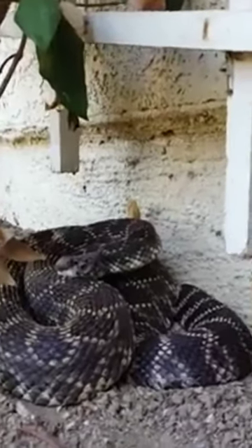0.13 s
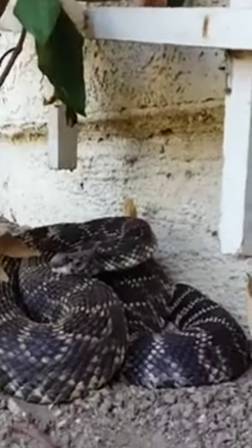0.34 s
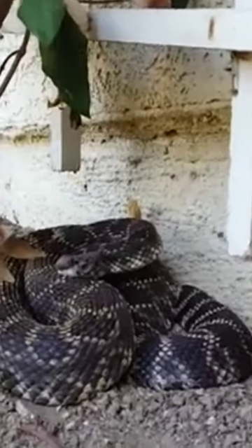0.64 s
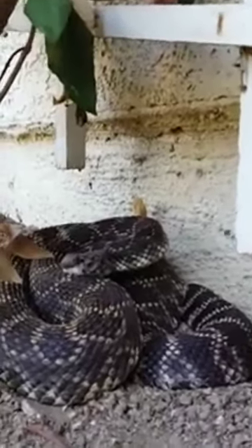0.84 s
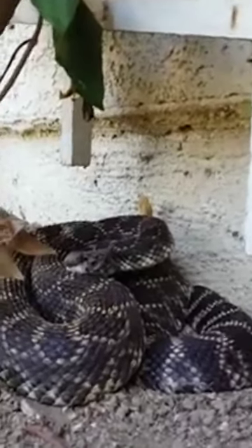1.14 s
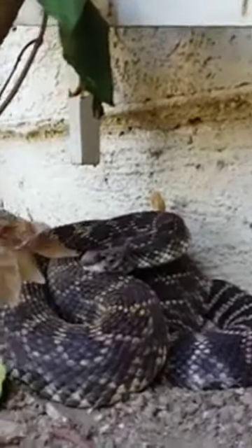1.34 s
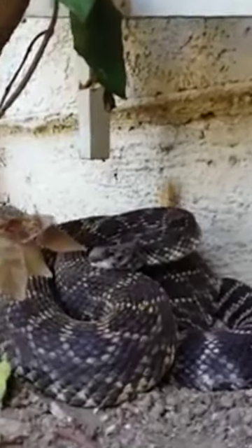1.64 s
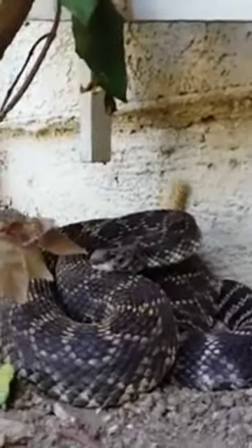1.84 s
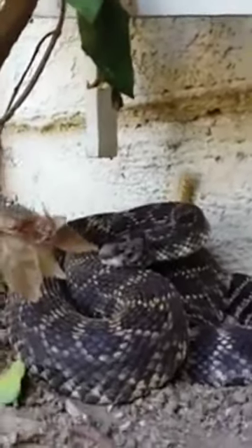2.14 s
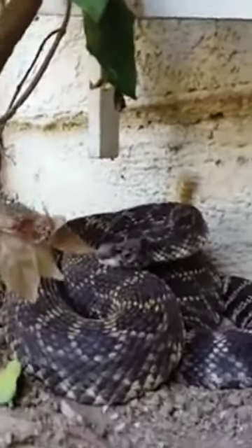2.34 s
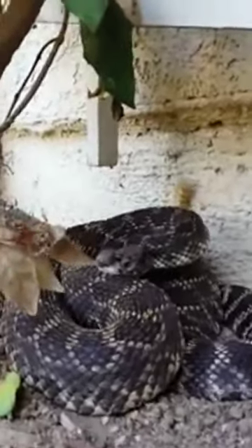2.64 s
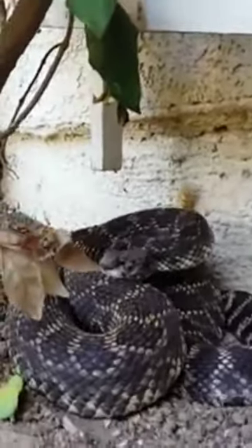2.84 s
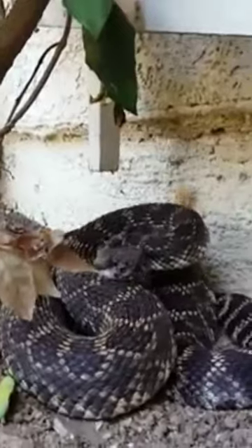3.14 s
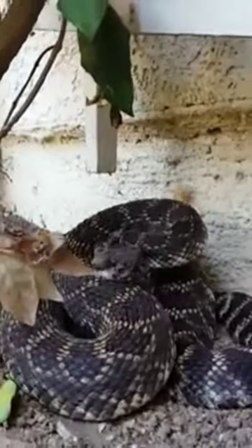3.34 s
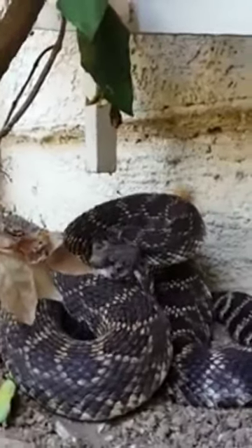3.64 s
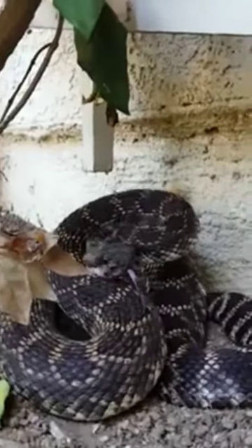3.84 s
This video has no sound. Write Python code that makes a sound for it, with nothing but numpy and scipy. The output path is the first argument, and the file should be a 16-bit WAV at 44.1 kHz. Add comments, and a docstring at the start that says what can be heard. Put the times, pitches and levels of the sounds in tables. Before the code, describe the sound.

A rattlesnake's loud, dry buzzing rattle bursts out after a quiet, faintly ticking outdoor moment.

```python
"""A low outdoor rumble, a faint steady whine and a soft rustle run throughout.
A few small ticks and dry scuffs come first: short dying rings with cracks, and swells of grainy noise.
At about 1.6 s a coiled rattlesnake on gravel beside a wall stirs, then shakes its tail into a loud dry buzz.
At each turn of the tail the loose hollow segments scrape and knock; wall and ground scatter the clicks.
Three soft hollow taps, made of dying tones, fall near 2 s as the buzz grows."""
import sys
import numpy as np
from scipy import signal
from scipy.fft import rfft, irfft
from scipy.io import wavfile

SR = 44100
rng = np.random.default_rng(int(sys.argv[2]) if len(sys.argv) > 2 else 0)


def wrap_up_sound(samples):
    """Save the sound to the file named by the first command line argument, as 16-bit audio."""
    columns = np.atleast_2d(samples).T
    # keep every value between -1 and 1, then stretch to whole-number steps
    tamed = np.clip(columns, -1, 1)
    steps = np.round(tamed * 32767).astype(np.int16)
    wavfile.write(sys.argv[1], SR, steps)


N = 176400
PADDED = N + SR // 10  # room for tails, so that filters do not wrap around
TIME, FREQ = np.arange(N) / SR, np.fft.rfftfreq(PADDED, 1 / SR)


def amp(db):
    """Turns decibels into gain."""
    return 10 ** (np.asarray(db) / 20)


def unit(x):
    """Scales to an rms of 1."""
    return x / np.sqrt(np.mean(x ** 2) + 1e-20)


def over_hz(table, axis=1):
    """Reads one column of a table at every frequency, on a log-frequency axis."""
    table = np.array(table)
    return np.interp(np.log(FREQ + 1), np.log(table[:, 0] + 1), table[:, axis])


def level(curve):
    """Draws gain over time from rows of seconds and dB."""
    return amp(np.interp(TIME, *np.transpose(curve)))


def colour(x, table):
    """Filters by a spectrum, keeping the power of white noise."""
    return irfft(rfft(x, PADDED) * unit(amp(over_hz(table))))[:, :N]


def drift(rate_hz):
    """Makes a random motion of rms 1 by keeping only the slow part of noise."""
    slow = np.exp(-(FREQ / rate_hz) ** 2) * (FREQ > 0)
    return unit(irfft(rfft(rng.standard_normal(PADDED)) * slow)[:N])


def pan(pan_db):
    """Gains for left and right; a negative value leans to the right."""
    return amp([[pan_db / 2], [-pan_db / 2]])


def noise_pair(same, pan_db):
    """White noise for left and right, alike by the share 'same' (0 to 1)."""
    a, b = rng.standard_normal((2, N))
    return np.array([a, same * a + np.sqrt(1 - same ** 2) * b]) * pan(pan_db)


def ring(hz, t60):
    """One dying tone, started at a random phase; it falls 60 dB in t60 seconds."""
    t = TIME[:SR // 8]
    return amp(-60 * t / t60) * np.sin(2 * np.pi * (hz * t + rng.random()))


def add(mix, s, sound):
    """Adds a sound to the mix at its time in seconds."""
    part = mix[round(s * SR):][:len(sound)]
    part += sound[:len(part)]


# Effort of the tail. Each row: time in seconds, relative level in dB.
EFFORT = [(1.55, -60), (1.585, -32), (1.63, -31.5), (1.66, -18), (1.71, -20.5), (1.76, -12.5), (1.86, -9),
          (1.96, -4), (2.18, -1), (2.55, 0.7), (3.1, 1), (3.62, 2), (4, 2)]
# First loose knocks. Each row: time in seconds, relative strength in dB.
STIRS = [(1.572, 3), (1.576, -3), (1.589, 3), (1.617, 0), (1.652, 7.5), (1.664, 3), (1.683, 5)]
SHAKE_HZ, SHAKE_WANDER = 70.56, .012  # full swings per second, rms wander as a share of that
SEGMENT_LAG, KNOCK_JITTER_S = .114, .0004  # lag of each segment in strokes, rms timing scatter
BACKSTROKE_DB, STROKE_SPREAD_DB, KNOCK_SPREAD_DB, FLUTTER_DB = -1.5, .2, 1.4, .2
SLIDE_S, SCRAPES_PER_S = .0012, 16000  # build-up time of a slide, scrape chances over all segments
SCRAPE_SHARE, SCRAPE_SPREAD_DB = .4, 1.5  # scrapes' share of the power, spread of their strength


def segment_clicks(count=8):
    """One click train per segment: at each turn of the tail it slides, chattering harder, until it knocks."""
    speed = SHAKE_HZ * (1 + SHAKE_WANDER * drift(4))
    strokes = 2 * np.cumsum(speed) / SR
    turns = TIME[1:][np.diff(np.floor(strokes)) > 0]
    backstroke = np.arange(len(turns)) % 2
    stroke_db = BACKSTROKE_DB * backstroke + STROKE_SPREAD_DB * rng.standard_normal(len(turns))
    force = level(EFFORT) * amp(FLUTTER_DB * drift(9.0))

    knocks = np.zeros((count, N))
    for k, train in enumerate(knocks):
        late, hard = rng.standard_normal((2, len(turns)))
        at = turns + k * SEGMENT_LAG / (2 * SHAKE_HZ) + KNOCK_JITTER_S * late
        strength = amp(stroke_db + KNOCK_SPREAD_DB * np.minimum(hard, 2))
        train[(at * SR).astype(int) % N] = strength * rng.choice([-1, 1], len(turns))

    # A decay run backwards in time grows towards each knock
    fade = np.exp(-1 / (SLIDE_S * SR))
    slide = signal.lfilter([1], [1, -fade], abs(knocks)[:, ::-1])[:, ::-1]
    grit_db = SCRAPE_SPREAD_DB * np.minimum(rng.exponential(1, (count, N)), 3)
    grit = amp(grit_db) * rng.choice([-1, 1], (count, N))
    catches = rng.random((count, N)) < SCRAPES_PER_S / count / SR
    scrapes = np.sqrt(slide) * grit * catches

    mix = np.sqrt(1 - SCRAPE_SHARE) * unit(knocks) + np.sqrt(SCRAPE_SHARE) * unit(scrapes)
    trains = mix * force / np.sqrt(count)
    for train, (s, db) in zip(trains, STIRS):  # each stir knocks a different segment
        train[round(s * SR)] += amp(db)
    return trains


GROUND_ECHO_S, GROUND_ECHO_DB = .0009, -15
SWAY_S, SWAY_HZ = .00022, 7  # rms shift of the echo, quickness of the shift


def sway(x):
    """The ground's reflection shifts as the tail sways, so the resonances swell and fade."""
    late = TIME - GROUND_ECHO_S - SWAY_S * drift(SWAY_HZ)
    return x + amp(GROUND_ECHO_DB) * np.interp(late, TIME, x)


# Ring of the hollow segments. Each row: frequency in Hz, left and right relative levels in dB.
SHELL = [(300, -41, -32.5), (694, -35, -33.5), (1120, -37.5, -34.5), (1710, -28.5, -27), (2040, -17, -21),
         (2290, -19.5, -20.5), (2380, -12, -14.5), (2840, -6, -14.5), (3020, -15.5, -8.5),
         (3496, -8.5, -7.5), (3764, -11.5, -2), (3930, -5.5, -7), (4190, -13, 0.5), (4500, -7, -1),
         (4670, -10.5, -0.5), (4950, -11.5, -9), (5390, -20, -5), (5900, -16, 0.5), (6050, -11, -3.5),
         (6340, -19, -14.5), (6530, -19.5, -11), (6910, -20, -19), (8020, -16.5, -26.5), (8830, -19, -45),
         (10200, -26.5, -50), (11230, -19, -23), (12500, -18, -18.5), (15300, -19, -20)]
# Likeness of left and right. Each row: frequency in Hz, likeness from 0 to 1, right phase in radians.
LIKENESS = [(700, 0.36, 0.5), (1100, 0.46, -1), (1515, 0.99, -3), (2050, 0.89, -2.5), (2500, 0.77, -3.5),
            (2910, 0.61, -2.5), (3320, 0.67, -4), (3490, 0.58, -3.5), (3794, 0.73, -5.5), (4060, .5, -3.5),
            (4380, 0.72, -2), (4490, 0.34, -7.5), (4670, 0.75, -5), (6080, 0.52, -7), (6630, 0, -3),
            (11100, 0.01, -8), (15400, 0, -14.5)]
RATTLE_DB, SCATTER_T60_S = -21, 0.018
WALL_ECHO_S, WALL_ECHO_DB = .00463, -12


def rattle():
    """The clicks ring the shell and arrive directly, off the wall, and scattered by the ground."""
    trains = segment_clicks()
    t = TIME[:SR // 20]
    tails = rng.standard_normal((2, len(trains), len(t))) * amp(-60 * t / SCATTER_T60_S)
    tails /= np.linalg.norm(tails, axis=2, keepdims=True)
    scattered = sum(signal.oaconvolve(train[None], tails[:, k], axes=1) for k, train in enumerate(trains))

    same = over_hz(LIKENESS)
    phase = np.outer([0, 1], over_hz(LIKENESS, axis=2))  # turns the right side only
    direct = rfft(sway(trains.sum(0)), PADDED) * np.exp(1j * phase)
    arriving = np.sqrt(same) * direct + np.sqrt(1 - same) * rfft(scattered, PADDED)
    wall = 1 + amp(WALL_ECHO_DB) * np.exp(-2j * np.pi * FREQ * WALL_ECHO_S)
    shell = unit(amp([over_hz(SHELL, axis=1), over_hz(SHELL, axis=2)]))
    return amp(RATTLE_DB) * irfft(shell * wall * arriving)[:, :N]


# Boost or cut of the band around 2 kHz. Each row: time in seconds, gain in dB.
BAND_LEVEL = [(1.6, 4), (1.9, 1.5), (2.25, 4), (2.6, 1), (3.1, -0.5), (4, -2)]
BAND_HZ, BAND_WIDTH_HZ = 2100, 520
BAND_DRIFT_DB, BAND_DRIFT_HZ = 2.3, 14


def lower_band(x):
    """The band around 2 kHz is louder early than late; a slow random gain varies its level."""
    bell = np.exp(-((FREQ - BAND_HZ) / BAND_WIDTH_HZ) ** 2)
    band = irfft(rfft(x, PADDED) * bell)[:, :N]
    gain = level(BAND_LEVEL) * amp(BAND_DRIFT_DB * drift(BAND_DRIFT_HZ))
    return x + band * (gain - 1)


# Soft hollow taps. Each row: start in seconds, level of the low ring in dB, level of the high ring in dB.
TAPS = [(1.932, -52, -38.5), (2.11, -56, -41), (2.18, -37, -32)]
# Ring of the taps. Each row: frequency in Hz, relative level in dB, seconds to fall 60 dB.
TAP_MODES = [(170, 1, 0.054), (377, -17, 0.027), (690, 0, 0.03), (1010, -10, .025), (1580, -2.5, 0.023),
             (1644, -5, .04), (1950, -2, 0.024)]
TAP_RISE_S, TAP_SPLIT_HZ = 0.0011, 1200  # the split parts low ring from high


def taps():
    """Soft knocks on something hollow: dying tones with a softened start."""
    out = np.zeros(N)
    for s, low_db, high_db in TAPS:
        body = 0
        for hz, db, t60 in TAP_MODES:
            tap_db = low_db if hz < TAP_SPLIT_HZ else high_db
            body = body + amp(db + tap_db) * ring(hz, t60)
        rise = np.minimum(TIME[:len(body)] / TAP_RISE_S, 1)
        add(out, s, rise * body)
    return out * pan(-3)


# Small dry ticks. Each row: start in seconds, level in dB, treble tilt in dB per octave,
# length of the slip in seconds.
TICKS = [(0.167, -43.5, -2, 0.001), (0.2871, -30, 2, .0012), (0.2885, -33, 0, 0.00091),
         (0.2892, -34, -4, .001), (.465, -45, -8, .001), (.866, -49, 6, .002), (1.051, -47, 5, .001),
         (1.074, -48, 3, .002), (1.099, -35.5, -3, 0.0036), (1.102, -37, 0, 0.0036),
         (1.108, -32, 3.5, 0.0025), (1.18, -50, 3, .002), (1.23, -50, 2, .003), (1.364, -49, 1, .001)]
# Ring of the ticks. Each row: frequency in Hz, relative level in dB, seconds to fall 60 dB.
TICK_MODES = [(360, -15, .02), (590, -16.5, .02), (1200, -9, 0.02), (1590, -8, .013), (2010, -14.5, 0.028),
              (2440, -10, .012), (3090, -9.5, 0.015), (3700, -15, 0.0088), (4200, -1, 0.0089),
              (4500, -2, 0.0088), (5200, -16, .016), (6100, -24, .006), (7450, -22, .005)]
# Colour of the crack. Each row: frequency in Hz, relative level in dB.
TICK_CRACK = [(500, -3), (3000, -4.5), (4500, 0), (5800, -15), (7600, -16), (9000, -32), (16000, -40)]
CRACK_DB, CRACK_T60_S = -7.5, .005  # level against the tick, fall time before the slip is added


def ticks():
    """Brief dry slips: a broadband crack and the short ring of a small stiff body."""
    out, cracks = np.zeros((2, N))
    for s, db, tilt_db, slip in TICKS:
        body = 0
        for hz, mode_db, t60 in TICK_MODES:
            body = body + amp(mode_db + tilt_db * np.log2(hz / 2500)) * ring(hz, t60)
        t = TIME[:len(body)]
        rise = np.minimum(t / slip, 1)
        add(out, s, amp(db) * rise * body)
        fall_db = -60 * t / (CRACK_T60_S + slip)
        add(cracks, s, amp(db + CRACK_DB + fall_db) * rng.standard_normal(len(t)))
    return (out + colour(cracks[None], TICK_CRACK)) * pan(-5)


# Faint dry scuffs. Each row: start in seconds, length in seconds, relative level in dB.
SCUFFS = [(0.34, 0.054, -61), (0.423, 0.043, -58), (0.87, 0.078, -65.5), (0.957, 0.26, -60),
          (1.156, 0.11, -60), (1.407, 0.047, -60.5)]
# Colour of the scuffs. Each row: frequency in Hz, relative level in dB.
SCUFF = [(1000, -30), (2050, -3), (2600, -17), (3150, -5.5), (3500, -12), (4000, 3.5), (4500, -13),
         (5500, -4.5), (6300, -19), (15000, -40)]


def scuffs():
    """Short grainy swells of rubbing: noise whose level flickers quickly."""
    swell = np.zeros(N)
    for s, length, db in SCUFFS:
        swell += amp(db) * np.sin(np.pi * np.clip((TIME - s) / length, 0, 1))
    grain = unit(amp(3.1 * drift(150)))
    return colour(swell * grain * noise_pair(same=0.22, pan_db=-9.5), SCUFF)


# Upper part of the rumble, which comes and goes. Each row: time in seconds, relative level in dB.
DRONE_LEVEL = [(0.0, -47), (0.23, -53.5), (0.62, -43), (1.06, -46), (1.18, -62), (1.26, -54.5),
               (1.67, -54.5), (1.96, -42.5), (1.97, -53.5), (2.85, -48), (2.95, -39), (2.97, -48),
               (3.2, -40), (3.39, -45.5), (3.95, -40.5), (4.0, -45)]
# Its colour. Each row: frequency in Hz, relative level in dB.
DRONE = [(80, -40), (170, -4), (230, 1), (310, 1), (420, -8), (600, -18), (800, -28), (1150, -28),
         (1600, -38), (3000, -66)]
DRONE_DB, DRONE_PAN_DB = -2.5, -5


def drone():
    """The upper part of the rumble: coloured noise that swells and fades."""
    noise = noise_pair(same=0.81, pan_db=DRONE_PAN_DB)
    return amp(DRONE_DB) * level(DRONE_LEVEL) * colour(noise, DRONE)


# Level of the low rumble. Each row: time in seconds, relative level in dB.
RUMBLE_LEVEL = [(0.0, -44.5), (0.13, -39), (0.17, -48), (1.2, -42.5), (1.22, -47), (2.33, -43), (2.37, -38),
                (2.46, -43.5), (3.14, -44), (3.74, -40.5), (3.92, -49.5), (4.0, -42)]
# Its colour. Each row: frequency in Hz, relative level in dB.
RUMBLE = [(20, -33), (40, -26), (54, -10), (68, -0.5), (90, -3), (110, -5), (132, 7), (165, -4.5),
          (230, -4.5), (310, -29), (450, -30), (700, -41), (2000, -74)]
RUMBLE_DB, RUMBLE_SAME = 1.5, 0.87


def rumble():
    """The low outdoor rumble: bass noise, much alike on both sides."""
    noise = noise_pair(same=RUMBLE_SAME, pan_db=0)
    return amp(RUMBLE_DB) * level(RUMBLE_LEVEL) * colour(noise, RUMBLE)


# Soft rustle in the air. Each row: time in seconds, relative level in dB.
AIR_LEVEL = [(0, -57.5), (.27, -58.5), (.33, -59.5), (.6, -54), (.8, -55.5), (1.0, -56.5), (1.2, -59),
             (1.3, -59), (1.55, -55.5), (4, -59)]
# Its colour. Each row: frequency in Hz, relative level in dB.
AIR = [(300, -7), (550, -7), (800, -13), (1100, -11.5), (1500, -9.5), (1900, -5), (2600, -12.5),
       (3400, -14), (4100, -12.5), (5600, -16), (7000, -20), (10000, -31), (12500, -21.5), (15500, -23.5)]


def rustle():
    """A soft, wide rustle: coloured noise whose level flutters slightly."""
    flutter = amp(1.0 * drift(40))
    return level(AIR_LEVEL) * flutter * colour(noise_pair(same=0.033, pan_db=-3.5), AIR)


# Tones of the whine. Each row: frequency in Hz, relative level in dB.
WHINE = [(920.5, -73), (1363, -65), (1685, -74), (1836, -90), (2143, -76), (2729, -73.5)]
WHINE_DB, WHINE_WAVER_HZ = -0.5, 1.16  # shared level, rms waver of each tone


def whine():
    """A few faint steady tones, each wavering slightly in pitch."""
    tones = np.zeros(N)
    for hz, db in WHINE:
        pitch = hz + WHINE_WAVER_HZ * drift(24)
        tones += amp(db) * np.sin(2 * np.pi * np.cumsum(pitch) / SR)
    return np.sqrt(2) * amp(WHINE_DB) * tones


def scene():
    """The snake in front of its surroundings."""
    snake = lower_band(rattle())
    small_sounds = taps() + ticks() + scuffs()
    background = drone() + rumble() + rustle() + whine()
    return snake + small_sounds + background


EDGE_HZ = 15600


def record(dry):
    """Removes the treble above the edge with a steep low-pass filter."""
    low_pass = signal.firwin(511, EDGE_HZ, window=("kaiser", 9), fs=SR)
    return signal.oaconvolve(dry, low_pass[None], "same")


dry = scene()
out = record(dry)
wrap_up_sound(out)
```